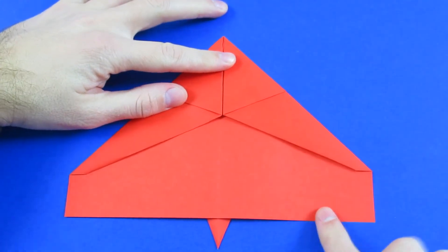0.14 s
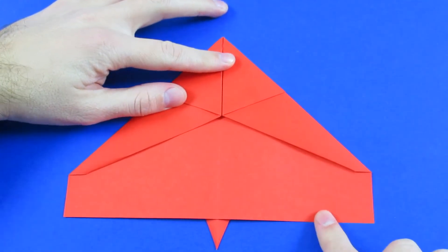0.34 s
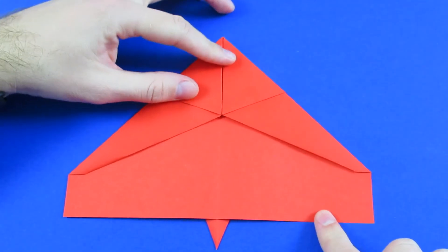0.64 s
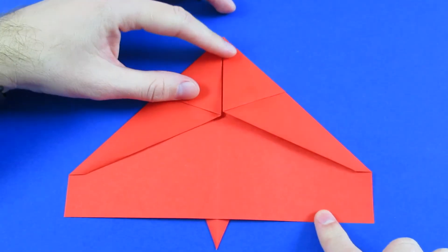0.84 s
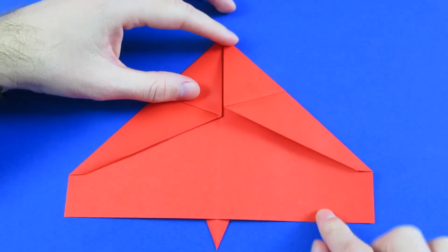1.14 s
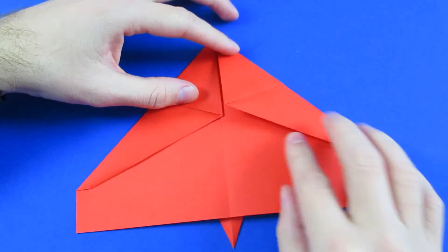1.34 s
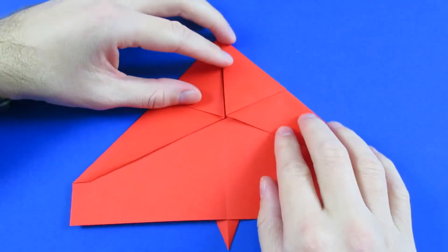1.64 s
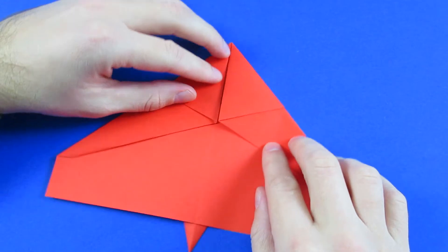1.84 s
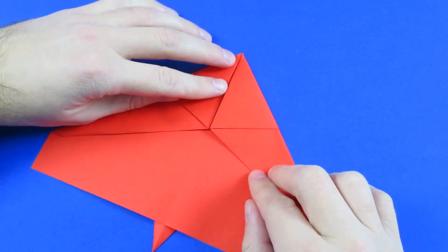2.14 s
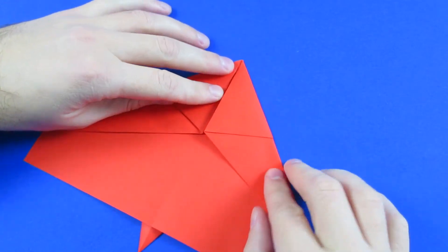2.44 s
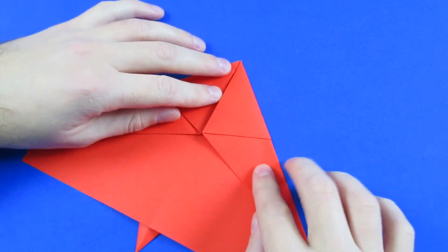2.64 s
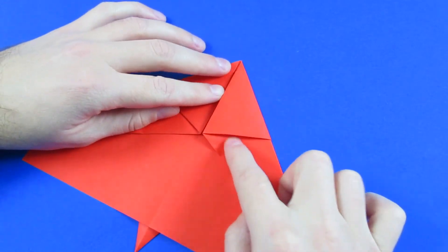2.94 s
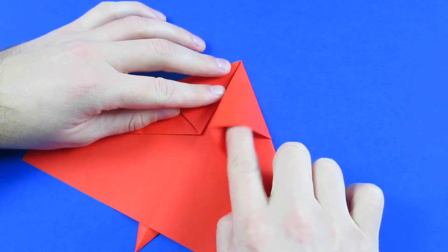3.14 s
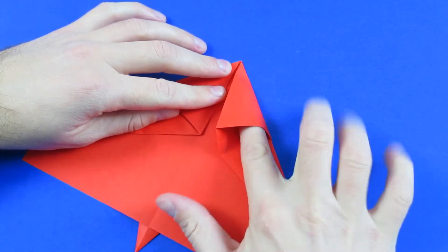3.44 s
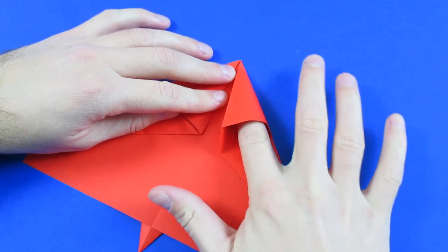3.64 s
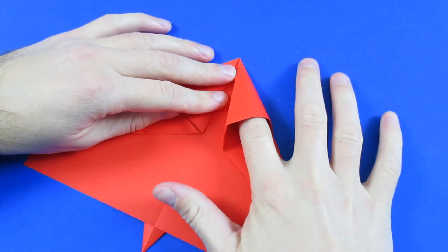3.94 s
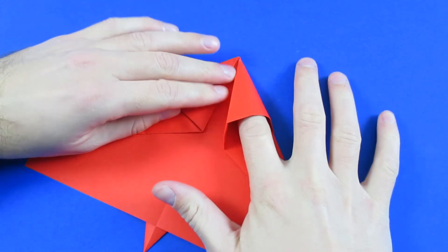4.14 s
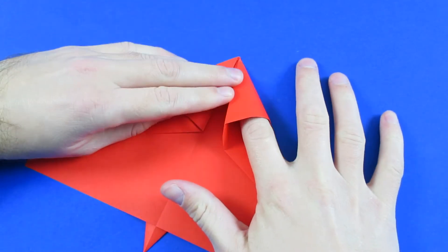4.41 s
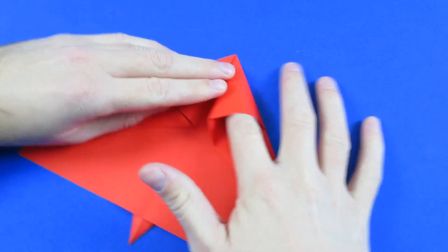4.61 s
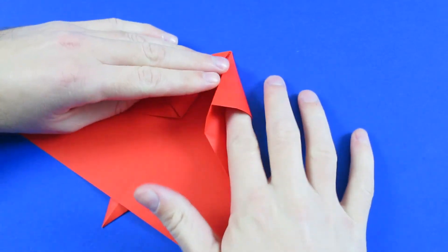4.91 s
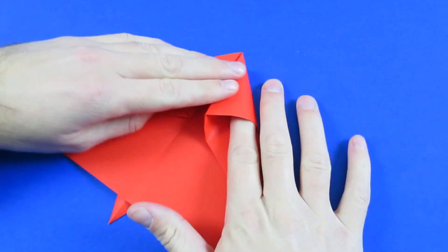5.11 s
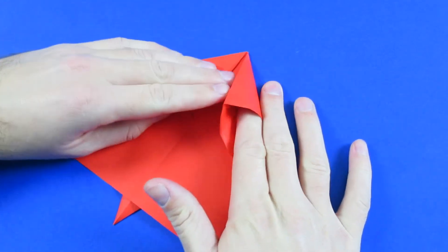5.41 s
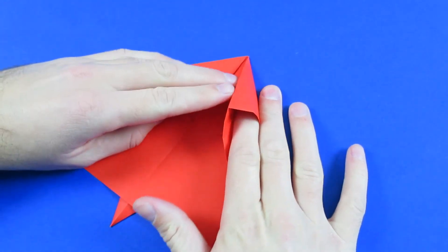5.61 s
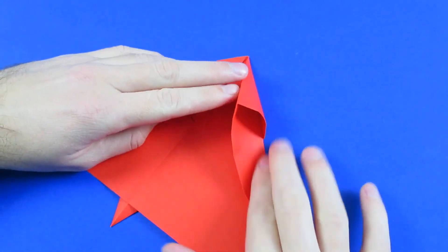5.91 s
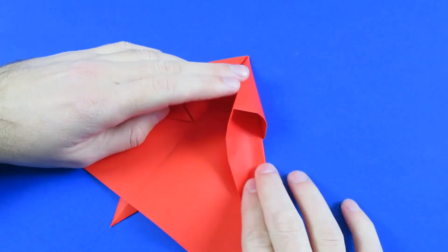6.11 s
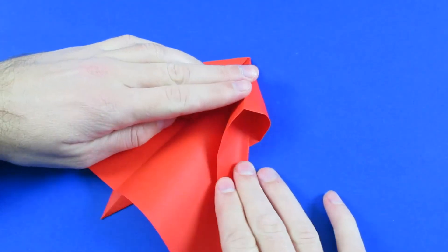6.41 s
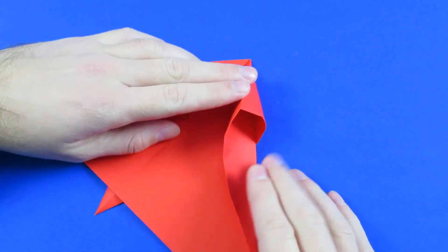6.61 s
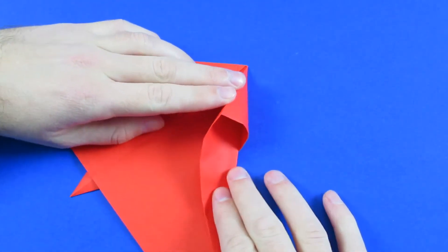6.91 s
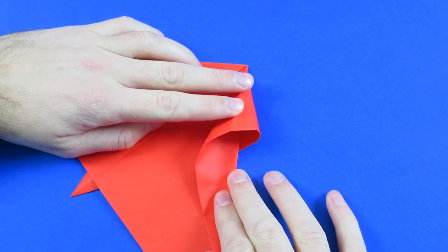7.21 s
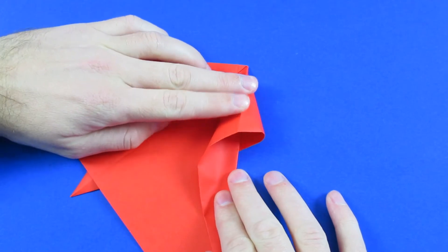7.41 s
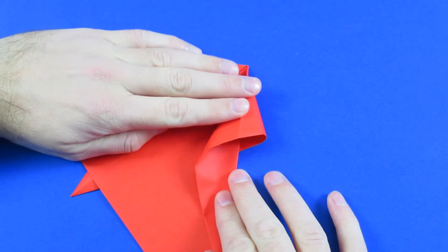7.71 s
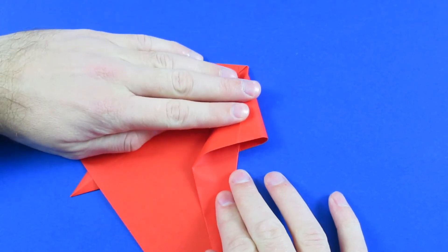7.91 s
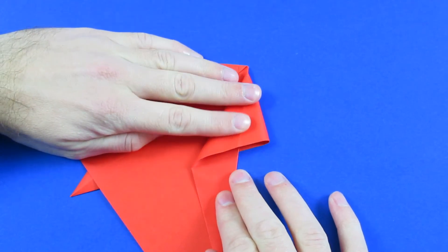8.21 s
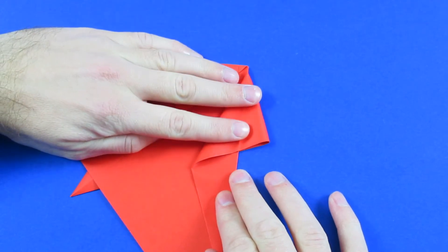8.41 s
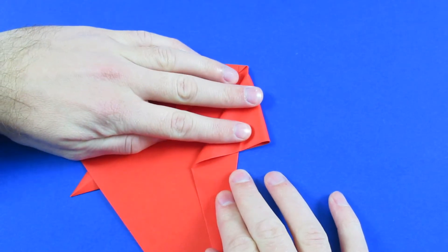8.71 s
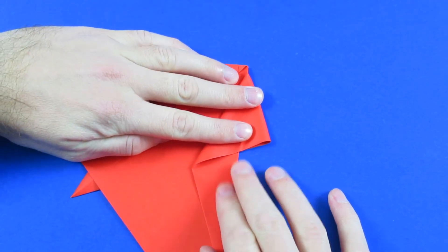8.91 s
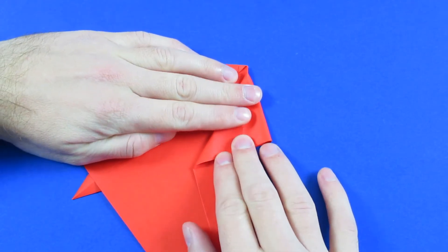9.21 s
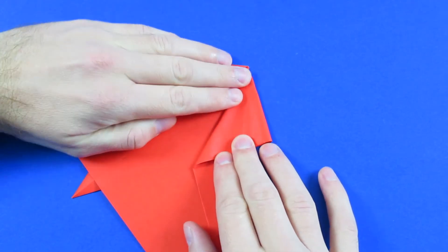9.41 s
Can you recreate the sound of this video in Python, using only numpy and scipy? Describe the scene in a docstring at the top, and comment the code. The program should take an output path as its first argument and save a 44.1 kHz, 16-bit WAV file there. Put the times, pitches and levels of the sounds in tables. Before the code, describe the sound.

A folded sheet of paper is handled on a tabletop in a small quiet room. Soft rubbing and fingertip taps come first, then busier rustling with crisp crease snaps around two to three seconds. Sliding swells mid-way, a flick follows, things thin to small ticks, and one hard crack with a knock lands near the end. Close single microphone, faint hiss and low rumble.

```python
"""Folding paper on a table

A folded sheet of paper is turned, opened and pressed flat by hand on a table in a small quiet room.
Skin and paper rub as dense random grains; creases snap as bursts of clicks that ring the sheet.
Fingertips thud on the table top, which hums under the rubbing as noise rings its low modes.
One microphone hears it all, over a faint hiss and a low rumble of shaped noise."""
import sys
import numpy as np
from scipy import signal
from scipy.fft import rfft, irfft, next_fast_len
from scipy.io import wavfile

SR = 44100
rng = np.random.default_rng(int(sys.argv[2]) if len(sys.argv) > 2 else 0)


def persist_wave(psi):
    """Save psi, clipped to +-1, as 16-bit WAV."""
    counts = np.round(np.clip(psi, -1, 1) * 32767).astype(np.int16)
    wavfile.write(sys.argv[1], SR, np.atleast_2d(counts).T)


N = 421140   # length in samples


def from_db(db):
    """Turns a level in dB into a gain."""
    return 10 ** (np.asarray(db) / 20)


def rms_one(x):
    """Scales a signal to an rms of 1."""
    return x / np.sqrt(np.mean(x ** 2) + 1e-20)


def drift(rate_hz):
    """A slow random wander of rms 1, with little movement faster than rate_hz."""
    step = 40   # worked out at every 40th sample
    r = np.exp(-2 * np.pi * rate_hz * step / SR)
    white = rng.standard_normal(N // step + 2002)
    slow = signal.lfilter([1], [1, -2 * r, r * r], white)[2000:]   # skip the start-up
    return np.interp(np.arange(N) / step, np.arange(len(slow)), rms_one(slow))


def ring(x, hz, t60):
    """A resonance: a unit click starts a sine of height 1 that dies by 60 dB in t60 seconds."""
    r = from_db(-60 / (t60 * SR))
    w = 2 * np.pi * hz / SR
    return signal.lfilter([0, np.sin(w)], [1, -2 * r * np.cos(w), r * r], x + 1e-18)


def colour(x, spectrum):
    """Gives a white signal the spectrum, almost silent outside it; rms 1."""
    hz, level_db = np.transpose(spectrum)
    size = next_fast_len(N)
    grid = np.maximum(np.arange(size // 2 + 1) * SR / size, 1)
    gain = from_db(np.interp(np.log(grid), np.log(hz), level_db, left=-90, right=-90))
    return rms_one(irfft(rfft(x, size) * gain, size)[:N])


def grains(per_s, spread_db, clump_db):
    """Fibres catch and let go at random, in clumps; a positive spread makes a few much harder."""
    strength = from_db(spread_db * np.minimum(rng.exponential(1, N), 5))
    sizes = strength * rng.standard_normal(N)
    chance = per_s * from_db(clump_db * drift(40)) / SR
    return sizes * (rng.random(N) < chance)


# The hiss and rumble of the quiet room. Each row: frequency in Hz, relative level in dB per Hz.
QUIET_SPECTRUM = [(22, -21), (50, 4), (72, -2), (160, 0), (900, -4.5), (2200, -6.5), (9000, -32),
                  (15500, -60)]


def quiet_room():
    """White noise shaped into a low rumble and a faint hiss."""
    rms_db = -57
    return from_db(rms_db) * colour(rng.standard_normal(N), QUIET_SPECTRUM)


def room_echoes(x):
    """A dense tail of echoes builds up and dies away, the treble twice as fast."""
    onset_s, t60_s, wall_cut_hz = 0.0041, 0.31, 2800
    t = np.arange(SR // 2) / SR
    echoes = rng.standard_normal(len(t)) * np.minimum(t / onset_s, 1) ** 2
    fading = from_db(-60 * t / t60_s)
    dull = signal.sosfilt(signal.butter(1, wall_cut_hz, fs=SR, output="sos"), echoes)
    tail = dull * fading + (echoes - dull) * fading ** 2
    return signal.fftconvolve(x, tail / np.linalg.norm(tail))[:N]


# How the table top rings.
# Each row: frequency in Hz, relative level in dB, time to die by 60 dB in seconds.
TABLE_MODES = [(141, 7, 0.29), (280.6, -0.5, 0.22), (399.6, -9.5, 0.19), (601.4, -7.5, 0.24)]


def table(force):
    """The table top rings in a few low modes when a force drives it."""
    return sum(from_db(level_db) * ring(force, hz, t60) for hz, level_db, t60 in TABLE_MODES)


# Fingertips and knuckles landing on the table.
# Each row: start in seconds, level of the push in dB, its frequency in Hz, its length in cycles.
THUDS = [(0.234, -43, 123, 3.2), (0.262, -33.5, 119, 4.2), (0.759, -38, 98.6, 6.9), (0.806, -49, 141, 7.5),
         (1.636, -47, 96, 6.5), (1.885, -48, 150, 1.9), (2.439, -45, 101, 5.8), (2.911, -47, 120, 4.2),
         (3.251, -44.5, 149, 1.9), (9.183, -27.5, 430, 5.1)]


def thuds():
    """A soft push of a few cycles moves the air; the bone then knocks and rings the table."""
    knock_db = 3   # knock over push, for a push of one cycle at 130 Hz
    push, knock = np.zeros(N + SR), np.zeros(N)
    for s, level_db, hz, cycles in THUDS:
        t = np.arange(round(cycles * SR / hz)) / SR
        swell = np.sin(np.pi * (t / t[-1]) ** 0.56) ** 2   # strongest before the middle
        at = round(s * SR)
        push[at:at + len(t)] += from_db(level_db) * np.sin(2 * np.pi * hz * t) * swell
        # The bone lands a cycle after the flesh; long or quick pushes knock less.
        knock[round((s + 1 / hz) * SR)] = from_db(level_db + knock_db) / cycles * 130 / hz
    softened = signal.lfilter([.08], [1, -.92], knock)
    dull_tap = 3.3 * ring(knock, 446, 0.035)
    return push[:N] + table(softened) + dull_tap


# A hand presses down and scuffs the table.
# Each row: start in seconds, load in dB, hold in seconds, time to fade by 20 dB in seconds.
PRESSES = [(0.235, -43.5, 0.057, 0.3), (1.886, -52, 0.018, 0.5), (2.911, -49, 0.1, 0.45),
           (3.46, -51.5, 0.076, 0.17), (5.975, -37, 0.0018, 0.08), (9.044, -47, 0.088, 0.13),
           (9.183, -33.5, 0.022, 0.04)]


def presses(now):
    """A press loads the table almost at once, holds and eases off."""
    attack_s, rest_db = 0.0024, -67.5   # the hands never lie quite still
    load = from_db(rest_db)
    for s, level_db, hold, fade in PRESSES:
        onset = np.clip((now - s) / attack_s, 0, 1)
        easing_db = 20 * np.clip(now - s - hold, 0, None) / fade
        load = load + onset * from_db(level_db - easing_db)
    return load


def table_hum(now, paper_stroke):
    """Rubbing noise rings the table modes, with a broader low scuff beside them."""
    slide_drag_db = -15   # load from a stroke, against its paper gain
    load = presses(now) + from_db(slide_drag_db) * paper_stroke
    load *= from_db(1.8 * drift(12))   # the hand sticks and slides
    drag = rng.standard_normal(N)
    band = signal.butter(2, [190, 720], "band", fs=SR, output="sos")
    scuff = rms_one(signal.sosfilt(band, drag))
    force = np.diff(drag, prepend=0)
    # The load acts before the modes, so they ring on after the hand stops.
    ringing = table(force * load) / table(force).std()
    return 0.32 * ringing + 0.69 * scuff * load


# Strokes of fingers and paper sliding.
# Each row: fastest moment in seconds, speeding up in seconds, slowing down in seconds,
# paper rustle in dB, skin hiss in dB.
STROKES = [(0.02, 0.14, 0.32, -47.5, -46), (0.23, 0.04, 0.048, -47, -44), (0.62, 0.15, 0.15, -54, -59),
           (1.26, 0.062, 0.056, -54, -50.5), (1.585, 0.22, 0.083, -59.5, -53.5),
           (1.87, 0.15, 0.14, -42, -44), (2.091, 0.084, 0.094, -45, -45), (2.19, 0.08, 0.091, -41.5, -45),
           (2.401, 0.033, 0.048, -43.5, -45), (2.50, 0.084, 0.059, -49, -54),
           (2.62, 0.072, 0.062, -49.5, -47), (2.80, 0.19, 0.29, -58.5, -57.5),
           (2.95, 0.057, 0.072, -48, -47), (3.12, 0.18, 0.36, -50.5, -51.5), (3.40, 0.16, 0.14, -45, -44),
           (3.529, 0.026, 0.025, -44.5, -40.5), (3.68, 0.19, 0.16, -49.5, -48.5),
           (3.78, 0.13, 0.059, -48.5, -70), (3.98, 0.032, 0.027, -53, -57),
           (4.08, 0.052, 0.033, -51.5, -59), (4.307, 0.053, 0.013, -57, -45.5),
           (4.68, 0.033, 0.051, -44.5, -53), (4.765, 0.099, 0.1, -36.5, -37),
           (4.96, 0.068, 0.077, -45.5, -45), (5.20, 0.16, 0.11, -44.5, -48),
           (5.391, 0.032, 0.043, -52, -52.5), (5.53, 0.12, 0.072, -48.5, -51.5),
           (5.80, 0.25, 0.12, -48.5, -52.5), (5.97, 0.18, 0.22, -47.5, -44),
           (6.17, 0.051, 0.082, -45.5, -52), (6.279, 0.052, 0.075, -47, -50.5),
           (6.375, 0.034, 0.058, -41, -49.5), (6.486, 0.12, 0.075, -37.5, -42.5),
           (6.942, 0.3, 0.074, -43, -50), (7.49, 0.059, 0.096, -57, -59.5), (7.66, 0.055, 0.045, -53, -56),
           (8.31, 0.064, 0.099, -53.5, -53), (9.08, 0.083, 0.062, -51.5, -58),
           (9.23, 0.16, 0.091, -56.5, -52), (9.40, 0.094, 0.09, -49.5, -47)]


def strokes(now):
    """Each stroke swells to a flat top and trails off; gives the gains of paper and skin."""
    edge_db = 13   # how far a stroke has dropped at either end
    rise_flatness, fall_flatness = 2.5, 3.4   # higher = flatter top, steeper side
    rest_paper_db, rest_skin_db = -63, -61   # the hands never lie quite still
    coarse = now[::40]
    paper_power, skin_power = from_db(rest_paper_db) ** 2, from_db(rest_skin_db) ** 2
    for s, up, down, paper_db, skin_db in STROKES:
        before = np.clip((s - coarse) / up, 0, None) ** rise_flatness
        after = np.clip((coarse - s) / down, 0, None) ** fall_flatness
        speed = 1 / (1 + (from_db(edge_db) - 1) * (before + after))
        paper_power = paper_power + (from_db(paper_db) * speed) ** 2
        skin_power = skin_power + (from_db(skin_db) * speed) ** 2
    paper_gain = np.interp(now, coarse, np.sqrt(paper_power))
    skin_gain = np.interp(now, coarse, np.sqrt(skin_power))
    return paper_gain, skin_gain


# Quick flicks of a flap. Each row: start in seconds, level in dB, hold in seconds.
FLICKS = [(1.343, -36.5, 0.014), (6.568, -35, 0.0086)]


def flicks(now):
    """A flick is a short extra burst of rubbing; gives its gain."""
    attack_s, release_s = 0.0033, 0.022
    gain = np.zeros(N)
    for at, level_db, hold in FLICKS:
        corners = np.cumsum([at, attack_s, hold, release_s])
        gain += from_db(level_db) * np.interp(now, corners, [0, 1, 1, 0])
    return gain


# The hiss of skin on paper. Each row: frequency in Hz, relative level in dB per Hz.
SKIN_SPECTRUM = [(3000, -11), (4800, -4.5), (6400, -3), (9500, -4), (15500, -10)]


def skin_hiss():
    """Dense, fairly even grains of skin rubbing, coloured bright; rms 1."""
    return colour(grains(15000, spread_db=-2.0, clump_db=0.2), SKIN_SPECTRUM)


# Pitch of the loose part of the sheet, which sings under the rubbing.
# Each row: time in seconds, frequency in Hz.
SHEET_PITCH = [(0, 2200), (2.2, 2650), (3.35, 3360), (3.76, 2770), (5.3, 2580), (6.45, 2340), (6.9, 3200),
               (9.5, 2480)]
# Resonances of that loose part. Each row: multiple of its pitch, relative level in dB.
SHEET_MODES = [(0.78, -6), (1, -2.5), (1.3, -12.5), (2.5, -9.5)]


def sheet(x):
    """Adds a few resonances that move as the folds change, stepped block by block; rms 1."""
    sharpness, flutter_db, block = 7, 5.5, 1024   # sharpness is pitch over width
    out = x.copy()
    for multiple, level_db in SHEET_MODES:
        sung, state = np.zeros(N), np.zeros(2)
        for i in range(0, N, block):
            w = 2 * np.pi * multiple * np.interp(i / SR, *np.transpose(SHEET_PITCH)) / SR
            r = np.exp(-w / 2 / sharpness)
            b, a = [(1 - r * r) / 2, 0, (r * r - 1) / 2], [1, -2 * r * np.cos(w), r * r]
            sung[i:i + block], state = signal.lfilter(b, a, x[i:i + block], zi=state)
        out += from_db(level_db + flutter_db * drift(18)) * sung   # each comes and goes on its own
    return rms_one(out)


def crackle():
    """Tiny creases give way now and then, each ringing at one of ten pitches; rms 1."""
    slips = grains(1500, spread_db=3.5, clump_db=5.5)
    dealt = rng.integers(0, 10, size=N)   # which pitch each slip gets
    total = np.zeros(N)
    for k, hz in enumerate(np.geomspace(1100, 7000, num=10)):
        rung = ring(slips * (dealt == k), hz, 22.0 / hz)
        total += np.diff(rung, prepend=0) / hz   # the slope has less bass
    return rms_one(total)


# The rustle of paper on paper. Each row: frequency in Hz, relative level in dB per Hz.
RUSTLE_SPECTRUM = [(450, -29), (800, -6.5), (2000, -3), (3600, -4), (4800, -9), (7000, -12), (9000, -41)]


def paper_rustle():
    """Dense grains of rubbing paper sing through the loose sheet, with some crackle."""
    rubbed = colour(grains(16000, spread_db=-1.0, clump_db=1.0), RUSTLE_SPECTRUM)
    return sheet(rubbed) + 0.38 * crackle()


# Creases snapping; the row at 9.1847 s is not a new crease but a strong bounce of the loud 9.1825 s snap off
# the table top. Each row: start in seconds, peak of the ringing patch in dB, its pitch in Hz, flap against
# patch in dB, treble against patch in dB, dying time of the burst in seconds.
SNAPS = [(0.769, -38, 2040, -8, -20, 0.002), (0.794, -29.5, 1970, -4.5, -30, 0.0029),
         (0.88, -28.5, 2430, -6, -37, 0.0021), (1.061, -17, 3020, -6, -5.5, 0.0023),
         (1.64, -27.5, 1340, -27, -9.5, 0.004), (2.056, -15, 2500, -12, -1.5, 0.0016),
         (2.175, -21.5, 2320, -8, -30, 0.0028), (2.587, -20.5, 1580, -12.5, -16, 0.0024),
         (2.639, -23, 2080, -5, -17, 0.0024), (2.827, -21.5, 1580, -5.5, -4.5, 0.0019),
         (3.027, -20.5, 2560, -13, -21.5, 0.0024), (3.042, -24, 1800, -27, -21, 0.0028),
         (3.07, -24.5, 2820, -10, -19, 0.0018), (3.093, -13, 3380, -17, -3, 0.0014),
         (3.256, -18.5, 2780, -5, 5, 0.0053), (3.666, -23.5, 1820, -49, -25, 0.0022),
         (3.717, -28.5, 1760, -21, -9, 0.0007), (4.386, -33, 2380, -11, -6, 0.0013),
         (4.863, -26, 2390, -16, -18, 0.0013), (5.531, -21.5, 1590, -1.5, -7.5, 0.006),
         (5.98, -19, 1190, -16, -4, 0.0079), (6.046, -13.5, 1570, -21, -27, 0.0069),
         (6.266, -25.5, 1100, -11, -16, 0.0055), (7.161, -38, 3220, -20, -6, 0.00094),
         (7.439, -30.5, 1710, -11, -26, 0.003), (8.11, -25, 2300, -3, -41, 0.0014),
         (8.19, -27.5, 1930, -8, -34.5, 0.0038), (8.458, -17, 3960, -12, -12, 0.00033),
         (8.627, -39, 1900, -4, -6, 0.002), (9.1825, -7.5, 3920, -8, -6, 0.0003),
         (9.1847, -15.5, 3580, -10, -17, 0.00034), (9.418, -17, 1270, -8.5, -31, 0.005)]


def snaps():
    """A click with a dying burst of smaller ones rings a patch of paper, flexes the flap and cracks."""
    patch_cycles = 6.9   # cycles for the patch to die by 60 dB
    table_echo_s, table_echo_db = 0.0021, -12
    out, size = np.zeros(N + SR), SR // 10
    t = np.arange(size) / SR
    flap_band = signal.butter(3, [650, 1600], "band", fs=SR, output="sos")
    for s, peak_db, hz, flap_db, treble_db, length in SNAPS:
        crumbs = rng.standard_normal(size) * np.exp(-t / length) * 1.2 / np.sqrt(length * SR)
        burst = crumbs + (t == 0)
        patch = np.diff(ring(burst, hz, patch_cycles / hz), prepend=0)   # the slope has less bass
        patch = signal.sosfilt(signal.butter(4, 2.56 * hz, fs=SR, output="sos"), patch)
        # A tighter patch cracks brighter.
        treble_band = signal.butter(3, [1.48 * hz, 3.1 * hz], "band", fs=SR, output="sos")
        # Neighbouring resonances alternate in sign.
        flap = -signal.sosfilt(flap_band, burst)
        treble = -signal.sosfilt(treble_band, burst)
        at = round(s * SR)
        for part, relative_db in [(patch, 0), (flap, flap_db), (treble, treble_db)]:
            out[at:at + size] += from_db(peak_db + relative_db) * part / np.abs(part).max()
    lag = round(table_echo_s * SR)   # first bounce off the table top
    out[lag:] += from_db(table_echo_db) * out[:-lag].copy()
    return out[:N]


def scene():
    """All sources meet at one microphone, heard alike in both channels."""
    room_db = -10
    now = np.arange(N) / SR
    paper_gain, skin_gain = strokes(now)
    flick = flicks(now)
    paper_stroke = paper_gain * from_db(1.2 * drift(22)) + flick   # the paper slides unevenly
    skin_stroke = skin_gain * from_db(1.6 * drift(12.5)) + flick   # the skin wavers on its own
    rubbing = paper_rustle() * paper_stroke + skin_hiss() * skin_stroke
    paper = rubbing + snaps()
    echoes = from_db(room_db) * room_echoes(paper)
    mono = quiet_room() + echoes + thuds() + table_hum(now, paper_stroke) + paper
    return np.array([mono, mono])


def record(dry):
    """The top is cut steeply."""
    cutoff_hz = 15330   # 60 dB down from here up
    return signal.sosfilt(signal.cheby2(18, 60, cutoff_hz, fs=SR, output="sos"), dry)


dry = scene()
out = record(dry)
persist_wave(out)
```